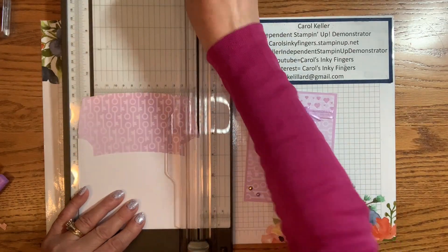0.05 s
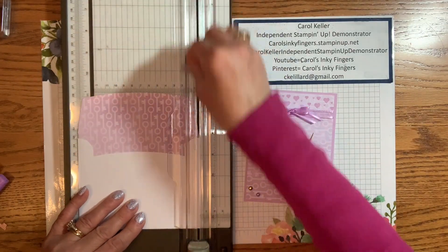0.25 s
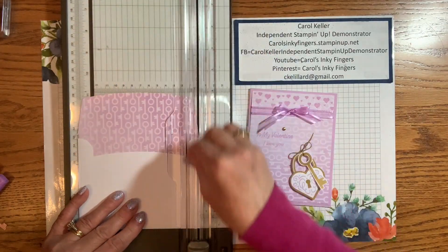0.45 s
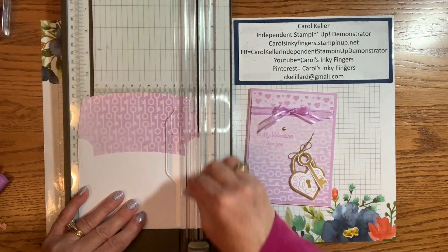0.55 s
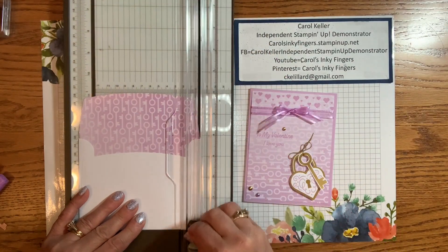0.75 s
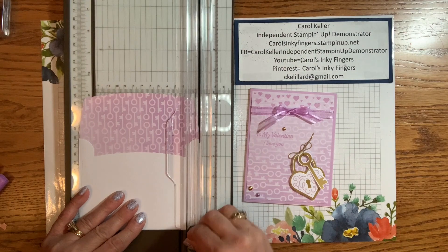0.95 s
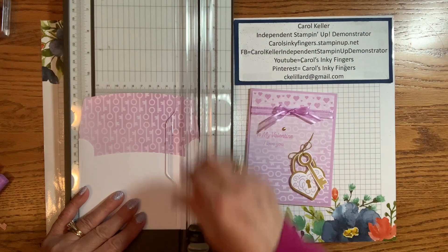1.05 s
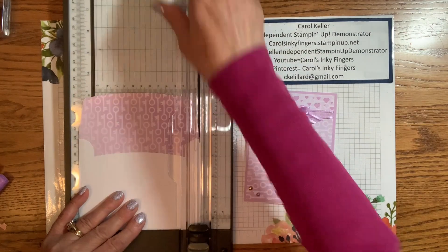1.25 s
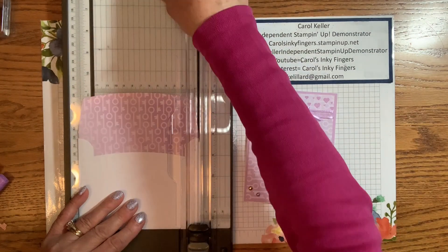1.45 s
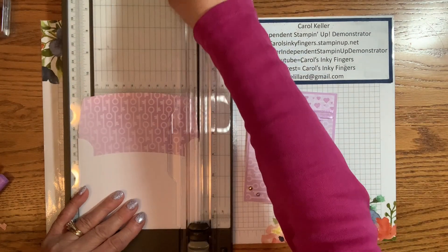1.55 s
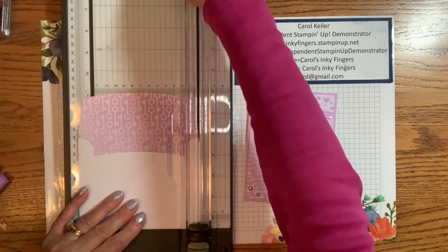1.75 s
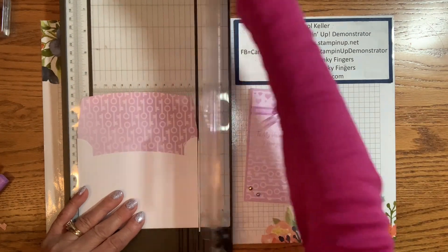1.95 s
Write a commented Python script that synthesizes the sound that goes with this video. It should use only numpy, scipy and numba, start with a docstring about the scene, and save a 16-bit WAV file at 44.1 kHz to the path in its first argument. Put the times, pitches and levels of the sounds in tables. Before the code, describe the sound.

Close up on a craft table, a paper cutter slides with a short scratchy zip, ends in a sharp plastic knock, pauses, then is handled with uneven clicks and clatter, over faint rustling in a small room.

```python
"""A paper trimmer on a craft table, heard from a phone held above it.
A low rumble and a faint rustle lie underneath from the start. After 0.4 s the blade carriage knocks
and hisses down its rail: fine grit rings it. It hits the end stop near 0.78 s. Then the plastic arm is
handled and clatters: short blows ring its body and arm and push the table.
A small room answers the slide and the knocks. Left and right differ in level and phase by frequency."""
import sys
import numpy as np
from scipy import signal
from scipy.fft import rfft, irfft
from scipy.io import wavfile
from scipy.ndimage import uniform_filter1d
from numba import njit

SR = 44100
rng = np.random.default_rng(int(sys.argv[2]) if len(sys.argv) > 2 else 0)


def to_wav(sig):
    """Store sig (one row per channel, or 1-D mono) as 16-bit WAV at the path in sys.argv[1].

    Samples outside -1..1 are clipped; the rate is SR.
    """
    pcm = np.clip(np.atleast_2d(sig), -1, 1) * 32767
    pcm = np.round(pcm).astype(np.int16)
    wavfile.write(sys.argv[1], SR, pcm.T)  # frames by channels


N = 89037  # length in samples

# ways the table top vibrates: (f/Hz, strength/dB, time to fall by 60 dB/s)
TABLE_MODES = [(108.6, -1.5, 0.066), (130, -1.5, 0.077), (167.5, -0.5, 0.1), (211.6, -3, 0.098),
               (315, -9, 0.082)]


def undb(db):
    """Turn a level in dB into a gain."""
    return 10 ** (np.asarray(db) / 20)


def unit(x):
    """Scale to an rms (average strength) of 1."""
    return x / np.sqrt(np.mean(x ** 2))


def colour(x, shape):
    """Filter by (Hz, dB) points; white noise keeps its rms."""
    hz, db = np.array(shape, float).T
    f = np.arange(len(x) // 2 + 1) * SR / len(x)
    gain = undb(np.interp(np.log(f + 1), np.log(hz), db, left=-60))
    return irfft(rfft(x) * unit(gain), len(x))


def ring(modes, spot_hz=None):
    """Sum of dying sine waves, one per mode, strongest near the pitch that the blow favours."""
    fall_db_per_oct = 4.5  # away from the favoured pitch
    focus_db, focus_oct = 5, 0.1  # extra strength right at it
    t = np.arange(SR // 5) / SR
    hz, db, t60 = np.array(modes).T[:, :, None]
    if spot_hz:
        away = np.abs(np.log2(hz / spot_hz))
        db = db - fall_db_per_oct * away + focus_db * np.exp(-(away / focus_oct) ** 2)
    sign = (-1.) ** np.arange(len(modes))[:, None]
    waves = sign * undb(db) * np.sin(2 * np.pi * hz * t)
    return np.sum(waves * 1000. ** (-t / t60), axis=0)


def walk(rate):
    """Random curve with `rate` new values a second, smoothed; spread near 1."""
    k = int(SR / rate)
    steps = np.repeat(rng.standard_normal(N // k + 1), k)
    return unit(uniform_filter1d(uniform_filter1d(steps, k), k)[:N])


@njit
def band(x, hz, width):
    """Band-pass filter whose centre can move: two linked memories swing at the centre pitch."""
    y, band_memory, low_memory = np.empty(len(x)), 0., 0.
    for i in range(len(x)):
        g, k = np.tan(np.pi * hz[i] / SR), width / hz[i]
        v = (band_memory + g * (x[i] - low_memory)) / (1 + g * (g + k))
        band_memory = 2 * v - band_memory
        low_memory = low_memory + 2 * g * v
        y[i] = k * v
    return y


def knocks(blows, rise_ms, tap):
    """Each blow is a tap and a short chatter that ring body and arm, crack in the treble and push the table."""
    # ways the hollow body and the arm vibrate: (f/Hz, strength/dB, time to fall by 60 dB/s)
    body_modes = [(368, -6.5, 0.046), (471, -5.5, 0.034), (547, 1.5, 0.023), (634, -2.5, 0.053),
                  (725, -3.5, 0.037), (865, -3, 0.04), (1016, -1.5, 0.024), (1163, 3.5, 0.028)]
    arm_modes = [(1410, -3.5, 0.021), (1652, -3, 0.02), (2013, -3.5, 0.02), (2174, -4, 0.036),
                 (2554, 5, 0.0069), (2892, -2.5, 0.02), (3254, 5, 0.0068), (3640, 2.5, 0.012),
                 (4010, 2.5, 0.01), (4530, 5.5, 0.0047), (5280, -6.5, 0.004)]
    # colour of the treble crack: (f/Hz, level per Hz/dB)
    crack_colour = [(1500, -40), (3500, -12), (5200, 0), (7000, -4), (9500, -5), (12000, -10), (15000, -21),
                    (17000, -30)]
    thud_lag_ms, thud_offset_db, body_offset_db, arm_offset_db, treble_offset_db = 3.7, -4, -4, -5.5, -3

    out = np.zeros((2, N + SR))
    ms = np.arange(SR // 8) / SR * 1000
    late = np.zeros(int(thud_lag_ms * SR / 1000))
    chance = rng.standard_normal((len(blows), len(ms)))
    for blow, chatter in zip(blows, chance):
        s, db, thud_db, body_db, treble_db, body_hz, arm_hz, decay_ms = blow
        push = np.where(ms < rise_ms, ms / rise_ms, np.exp(-(ms - rise_ms) / decay_ms))
        force = push * chatter + tap * np.exp(-((ms - rise_ms) / 0.03) ** 2)
        late_push = np.r_[late, push][:len(ms)]
        # The filter smears both ways: shift the force, then cut what lies ahead of it.
        crack = colour(np.roll(force, 64), crack_colour)[64:]
        parts = [(late_push, ring(TABLE_MODES), thud_db + thud_offset_db),
                 (force, ring(body_modes, body_hz), body_db + body_offset_db),
                 (force, ring(arm_modes, arm_hz), arm_offset_db),
                 (crack, np.ones(1), treble_db + treble_offset_db)]
        i = int(s * SR - rise_ms * SR / 2000)  # start half a rise early
        for x, response, part_db in parts:
            y = signal.fftconvolve(x, response)
            y = y / np.sqrt(np.max(uniform_filter1d(y ** 2, size=256)))  # loudest moment to 1
            out[:, i:i + len(y)] += undb(db + part_db) * y
    return out[:, :N]


def slide(t):
    """Fine grit under the carriage shakes the table, rings the rail and hisses in bands that drift and flicker."""
    # carriage on the rail: (t/s, table rumble/dB, rail ring/dB, pitch of the rail/Hz,
    # hiss at 1.5-2.5 kHz/dB, at 2.5-4.5 kHz/dB, at 4.5-7 kHz/dB, above/dB)
    travel = [(0.385, -80, -68, 623, -67, -62, -59, -80), (0.407, -58, -46, 600, -48.5, -46, -75, -64),
              (0.425, -72, -46.5, 654, -47, -47.5, -79, -57),
              (0.455, -53, -46, 696, -48.5, -48.5, -52.5, -57),
              (0.507, -72, -44.5, 715, -55, -50.5, -48.5, -54.5),
              (0.563, -53, -47, 900, -55.5, -43, -54.5, -56.5),
              (0.593, -58.5, -51.5, 1040, -61.5, -48.5, -50, -53.5),
              (0.643, -60.5, -46, 1210, -68, -43, -66, -57),
              (0.671, -57, -54.5, 1230, -44.5, -40, -58.5, -54.5),
              (0.701, -54.5, -45, 1310, -58, -46, -61, -56.5),
              (0.717, -54, -59, 1170, -67, -52, -60.5, -66.5),
              (0.772, -53.5, -55, 990, -63.5, -44.5, -70, -60)]
    # resonances of the hiss, one row for each of its four bands: (f/Hz, ...)
    hiss_centres = [(1650, 2050, 2350), (2940, 3520, 4080), (4600, 5250, 6100, 6800),
                    (7600, 8500, 9500, 10500, 11700, 13000, 14500)]
    stop_ms, rail_width_hz = 5.2, 510
    flicker_db, drift_share = 3, .015
    tilt_db_per_oct = -8  # within a band
    width_share = 0.088  # width over centre

    s, table_db, rail_db, rail_hz, *hiss_db = np.array(travel).T
    rub = grit(rate=5000, spread_db=2.)

    def curve(db):
        """Gain over time, fading out quickly at the end stop."""
        return undb(np.interp(t, np.r_[s, s[-1] + stop_ms / 1000], np.r_[db, -100], left=-120))

    hz = np.interp(t, s, rail_hz)
    rail = 0
    # pitch ratio, width ratio, level in dB
    for ratio, width, db in [(1.015, 0.5, -3), (1.1, 1.5, -12.0), (1.57, 0.2, -7.0), (0.66, 0.14, -14)]:
        tone = unit(band(rub, ratio * hz, rail_width_hz * width))
        rail = rail + undb(db + 0.89 * walk(28.6)) * tone
    table = unit(signal.fftconvolve(rub, ring(TABLE_MODES))[:N])
    out = curve(rail_db) * rail + curve(table_db) * table
    for centres, db in zip(hiss_centres, hiss_db):
        hiss = 0
        for c in centres:
            level_db = flicker_db * walk(36) + tilt_db_per_oct * np.log2(c / np.mean(centres))
            hiss = hiss + undb(level_db) * band(rub, c * (1 + drift_share * walk(5.7)), width_share * c)
        out = out + curve(db) * unit(hiss)
    return out


def grit(rate, spread_db):
    """Dense tiny catches of uneven size over a little steady noise."""
    hits = (rng.random(N) < rate / SR) * undb(spread_db * rng.exponential(size=N))
    return unit(hits * rng.standard_normal(N) + 0.18 * rng.standard_normal(N))


def room(x):
    """Dying noise tails by band, different for each channel, after a short gap."""
    # echo of the room: (f/Hz, time to fall by 60 dB/s, level before a doubling/dB)
    echo_bands = [(143, 0.24, -12.5), (412, 0.18, -10), (1010, 0.22, -9.5), (2440, 0.14, -13),
                  (5100, 0.25, -18), (11060, 0.11, -35.5)]
    gap = np.zeros(int(4.1 * SR / 1000))  # 4.1 ms
    t = np.arange(SR // 2) / SR
    out = []
    for side in x:
        echo = 0
        for hz, t60, db in echo_bands:
            noise = band(rng.standard_normal(len(t)), hz + 0 * t, .9 * hz)
            tail = noise * 1000. ** (-t / t60)
            echo = echo + undb(db) * tail * np.sqrt(hz / SR / np.sum(tail ** 2))
        out.append(signal.fftconvolve(side, np.r_[gap, 2 * echo])[:N])
    return np.array(out)


def rustle(t):
    """Faint rubbing of hand and paper: noise bands that swell on their own, partly alike in the two channels."""
    # course of the rustle before scaling: (t/s, level below 1.5 kHz/dB, level above/dB)
    swells = [(0, -53, -54), (.06, -54.5, -59), (.14, -71, -51), (0.239, -55, -54.5), (.32, -79, -51.5),
              (.39, -49, -55.5), (.8, -46, -44), (.9, -77, -62), (1.05, -57, -67.5), (1.149, -59, -66),
              (1.22, -65, -80), (1.3, -59, -99), (1.38, -46, -53), (1.47, -45.5, -62), (1.55, -56, -60),
              (1.64, -55, -48.5), (1.68, -54, -67), (1.75, -59, -52), (1.795, -41, -81), (1.87, -41, -49),
              (1.94, -52, -70), (2.02, -45, -65)]
    # its colour: (f/Hz, level per Hz/dB)
    rub_colour = [(300, 5), (700, 2), (1500, -2), (3500, 1), (6000, -4), (9500, -9), (12000, -19),
                  (16500, -30)]
    s, low_db, high_db = np.array(swells).T
    shared, left, right = (colour(rng.standard_normal(N), rub_colour) for _ in range(3))
    out = 0
    for hz in (500., 1000., 2000., 4000., 8000., 13000.):
        db = np.interp(t, s, low_db if hz < 1500 else high_db) + 0.81 * walk(11.0)
        pair = [band(0.36 * shared + 0.07 * own, hz + 0 * t, 1.13 * hz) for own in (left, right)]
        out = out + undb(db) * np.array(pair)
    return out


def rumble(t):
    """Low rumble of the house: deep filtered noise, nearly the same in both channels."""
    # colour of the rumble: (f/Hz, level per Hz/dB)
    deep_colour = [(24, -46.5), (40, -9.5), (139, -2.5), (169, -5.5), (242, -17.5), (297, -12.5),
                   (344, -32.5), (442, -22.5), (600, -38.5), (780, -74.5), (1320, -120)]
    # its course: (t/s, level/dB)
    course = [(0.0, -57), (0.25, -58.5), (0.7, -56.5), (1.19, -55.5), (1.35, -61), (1.7, -52.5),
              (2.02, -52.5)]
    s, db = np.array(course).T
    mid, side = (colour(rng.standard_normal(N), deep_colour) for _ in range(2))
    side = undb(-12) * side
    return undb(np.interp(t, s, db) + 0.43 * walk(7.77)) * np.array([mid + side, mid - side])


def smear(x):
    """A short random smear, new in each frame, makes left and right less alike."""
    # how unlike the channels become: (f/Hz, share of the power that differs between channels)
    unlike_share = [(400, 0), (2400, .45), (3800, .3), (6000, .7), (8200, 0), (9600, 0), (11500, .3),
                    (13800, 0)]
    decay_ms = 2.5
    f, _, frames = signal.stft(x, SR, nperseg=2048)
    ms = np.arange(2048)[:, None] / SR * 1000
    spray = rng.standard_normal((2, len(ms), frames.shape[2])) * np.exp(-ms / decay_ms)
    spray = spray / np.linalg.norm(spray, axis=1, keepdims=True)
    share = np.interp(f, *np.array(unlike_share).T)[:, None]
    response = np.sqrt(1 - share) + np.sqrt(share) * rfft(spray, axis=1)
    return signal.istft(frames * response, SR, nperseg=2048)[1][:, :N]


def scene():
    """Near sounds with their room, over the background; left and right channels differ in level and phase."""
    # knocks of plastic on plastic, before the offsets of each part: (t/s, level/dB,
    # table thud re level/dB, hollow body re level/dB, treble re level/dB,
    # favoured pitch of body/Hz, favoured pitch of arm/Hz, decay/ms)
    hard_blows = [(0.408, -39, -32, 3.5, -23, 540, 4230, 5), (0.4205, -38.5, -31, 0.5, -9, 1220, 3970, 9.6),
                  (0.7797, -20.5, -21, -12.5, -20, 1100, 2160, 4.6),
                  (0.7852, -20, -25, -18.5, -6, 1254, 3250, 4.3),
                  (0.788, -15, -20.5, -9.5, -2.5, 860, 2920, 1.5),
                  (0.7928, -17, -32, -12.5, -4, 1175, 4440, 3.5),
                  (0.8088, -42.5, 4, -21, -9, 668, 3625, 13),
                  (0.973, -33.5, -30.5, -17, -15.5, 1040, 3400, 7.9),
                  (0.9833, -37, -29, -14, -27.5, 638, 1950, 12),
                  (1.3015, -49, -18.5, -6, -16.5, 797, 3270, 5),
                  (1.3272, -26.5, -21, -3.5, -9, 572, 4180, 9), (1.3363, -35, 1, 0, -4, 560, 3700, 3),
                  (1.3551, -36, -41.5, -31, -9.5, 674, 1690, 5.2),
                  (1.3758, -44.5, -4, -10, -13, 620, 1380, 4.5),
                  (1.4116, -34.5, -19.5, -8.5, -25, 665, 1960, 6),
                  (1.4304, -35, -14, -7.5, -10, 634, 2290, 2.4),
                  (1.4818, -37.5, -32, -7.5, -2, 607, 3640, 3.3),
                  (1.5125, -29, -7, -2.5, -10.5, 592, 2880, 3.1), (1.528, -43, -8, -4, -9, 860, 1840, 1.9),
                  (1.566, -36, -3.5, -6, -24, 641, 2870, 1.9),
                  (1.5966, -36, -8.5, -26, -40, 693, 3800, 2.8),
                  (1.6049, -30.5, -55, -4, -32, 990, 3250, 7.2),
                  (1.6194, -32, -33, -11.5, -10, 630, 1320, 2.5),
                  (1.6432, -36.5, -35, -15, -34, 633, 2410, 7), (1.716, -21, -36, -6, -13, 668, 4220, 5.4),
                  (1.7262, -21, -24.5, -12.5, -13.5, 563, 3840, 3),
                  (1.7664, -43, 6, -8, -10, 904, 3800, 1.2), (1.7755, -31.5, -30, 0, -34, 999, 1400, 1.5),
                  (1.8045, -15.5, -14, -13, -9.5, 840, 2500, 2.5),
                  (1.813, -21, -23, -17, -25, 940, 3600, 2.5),
                  (1.8239, -22.5, -29, -15.5, -17, 846, 3180, 4.4),
                  (1.848, -35.5, -30, -14, -23, 730, 1420, 7), (1.8836, -41, -30, -20, -1, 706, 2130, 12),
                  (2.0028, -43.5, -9, -27, -9, 711, 1340, 4.5)]
    # scuffs, which rise more slowly and have no tap; same columns
    soft_blows = [(0.778, -20.5, -26, -12, -7.5, 1100, 2080, 4.2),
                  (0.9485, -66.5, -15, 8, -21, 716, 1400, 8), (1.073, -47, -18.5, -10, -20, 856, 1473, 29),
                  (1.4388, -45.5, -24, -3, -16, 620, 1730, 18.3),
                  (1.5062, -30, -21.5, -2.5, -16.5, 615, 1300, 9.2),
                  (1.5743, -41, -20.5, -4, -37, 655, 1920, 4.9),
                  (1.6314, -38.5, -10, -4, -37, 630, 1420, 5.9),
                  (1.7074, -40, -30.5, -0.5, -50, 686, 3800, 16),
                  (1.833, -35.5, -31, -18, -6, 867, 1300, 28),
                  (1.9042, -27, -16, -11, -13.5, 466, 2086, 8.7),
                  (1.9244, -41, -40, -7, -46, 860, 1490, 15),
                  (1.9569, -36, -3.5, -3, -15.5, 605, 1260, 9.1)]
    # level of left over right channel: (f/Hz, level/dB)
    channel_levels = [(60, -3.5), (110, 4.5), (200, 0.5), (380, 4.5), (700, 1.0), (1290, 0), (2380, -2.5),
                      (4400, -1), (8120, -1.5), (15000, -1.8)]
    # phase of left over right channel: (f/Hz, phase/radians)
    channel_phases = [(0, 0), (860, -.45), (1720, -.4), (2200, -1.), (3400, -1.6), (5000, -2), (6800, -3.9),
                      (8200, -3.14), (9600, -3.1), (11000, -2.1), (12800, -.4), (13800, 0)]

    t = np.arange(N) / SR
    near = knocks(hard_blows, rise_ms=.8, tap=4.) + knocks(soft_blows, rise_ms=6., tap=0) + slide(t)
    out = near + room(near) + rustle(t) + rumble(t)
    f = np.arange(N // 2 + 1) * SR / N
    hz, db = np.array(channel_levels).T
    # Each channel takes half of the difference, in opposite directions.
    level = undb(np.interp(np.log(f + 1), np.log(hz), db) / 2)
    tilt = level * np.exp(.5j * np.interp(f, *np.array(channel_phases).T))
    return irfft(rfft(smear(out)) * np.array([tilt, 1 / tilt]), N)


def record(dry):
    """The phone drops the deepest bass (below 45 Hz) and cuts the top (above 16 kHz)."""
    dry = signal.sosfilt(signal.butter(3, 45, "high", fs=SR, output="sos"), dry)
    return signal.sosfilt(signal.ellip(10, .2, 80, 16000, fs=SR, output="sos"), dry)


dry = scene()
out = record(dry)
to_wav(out)
```